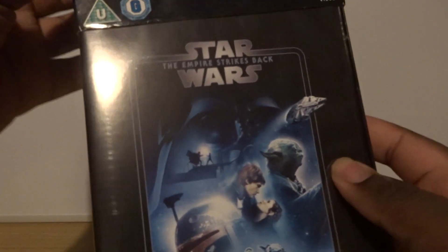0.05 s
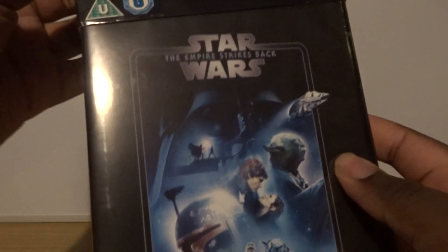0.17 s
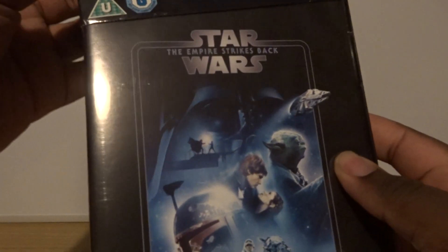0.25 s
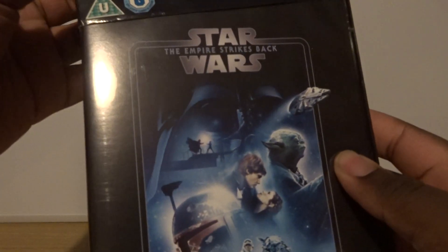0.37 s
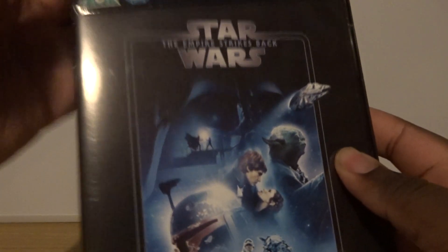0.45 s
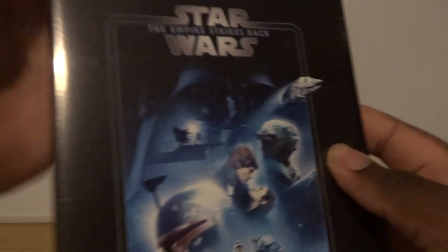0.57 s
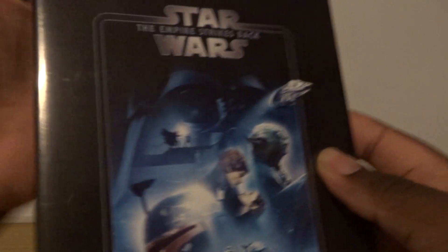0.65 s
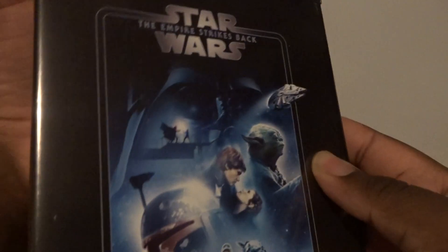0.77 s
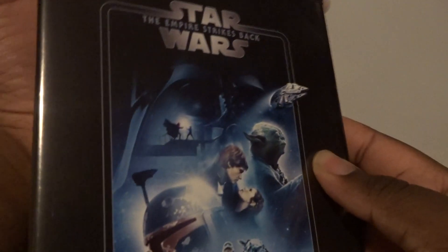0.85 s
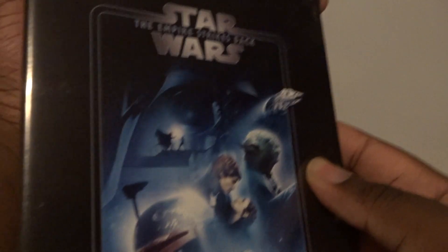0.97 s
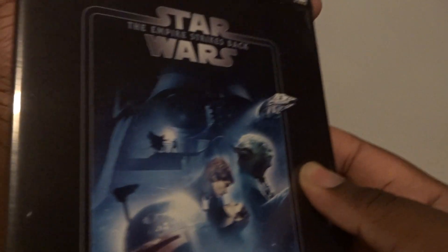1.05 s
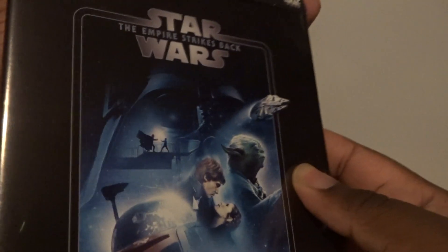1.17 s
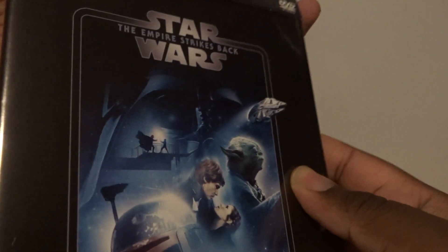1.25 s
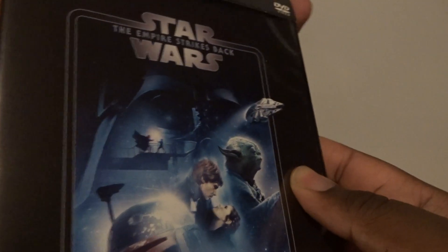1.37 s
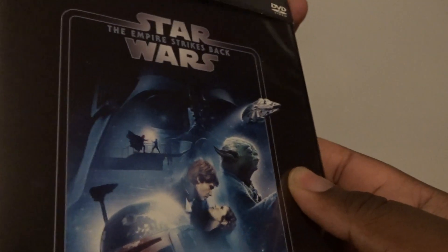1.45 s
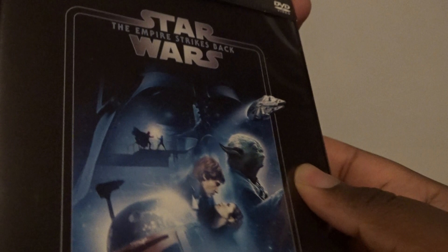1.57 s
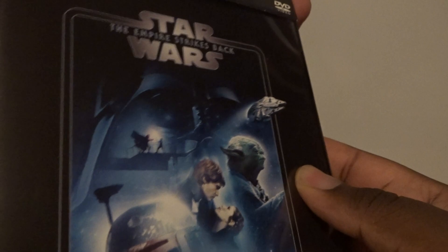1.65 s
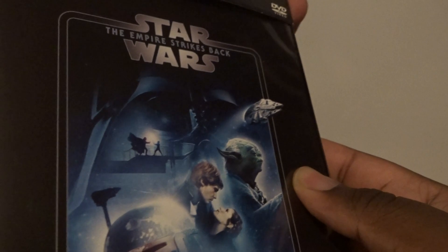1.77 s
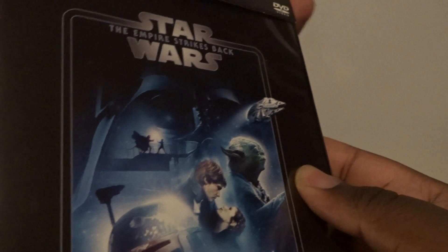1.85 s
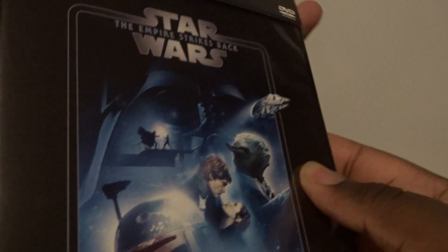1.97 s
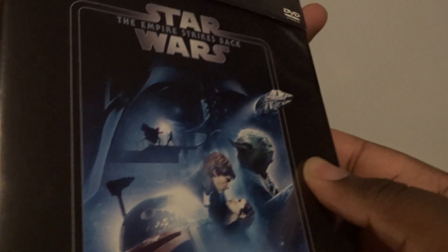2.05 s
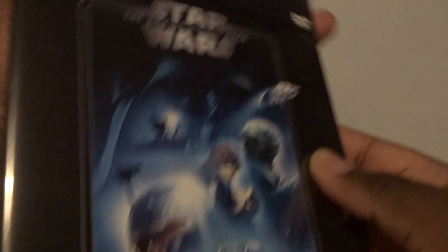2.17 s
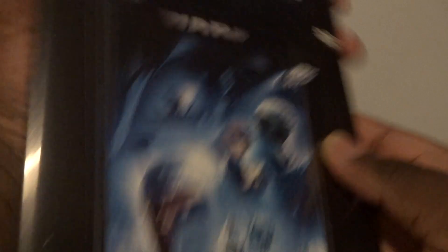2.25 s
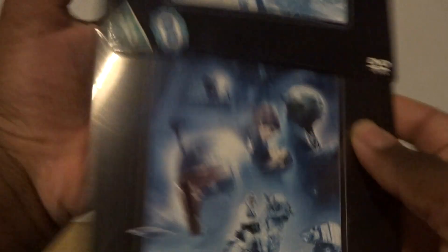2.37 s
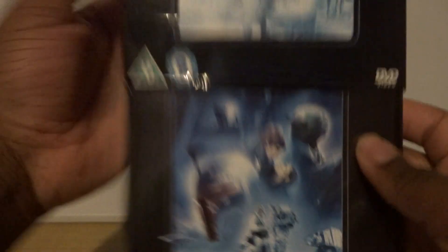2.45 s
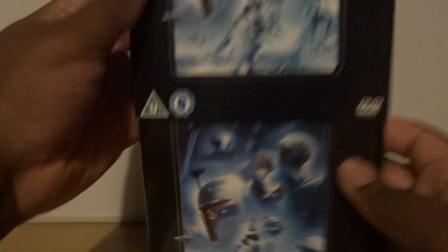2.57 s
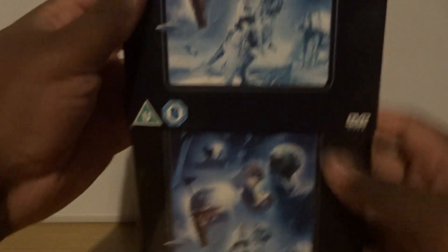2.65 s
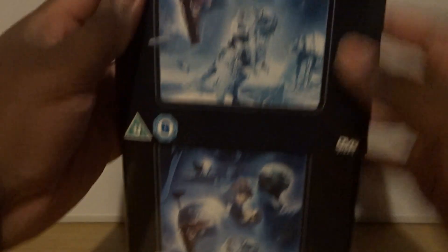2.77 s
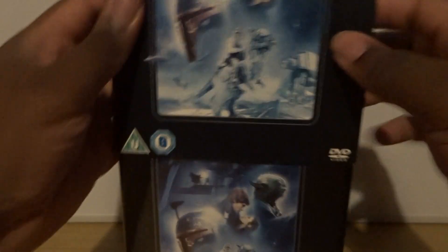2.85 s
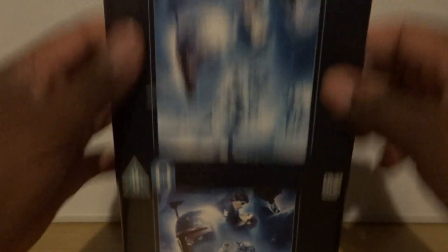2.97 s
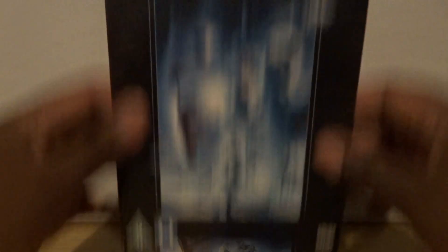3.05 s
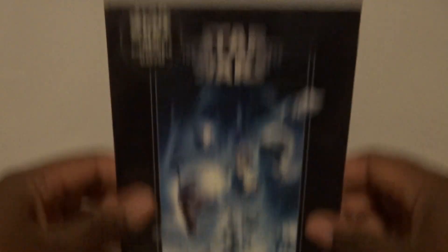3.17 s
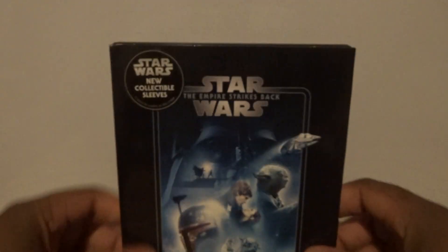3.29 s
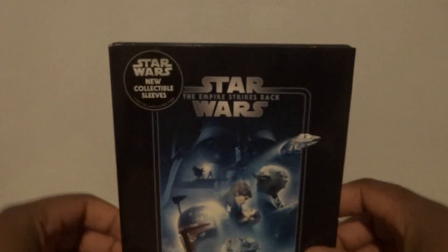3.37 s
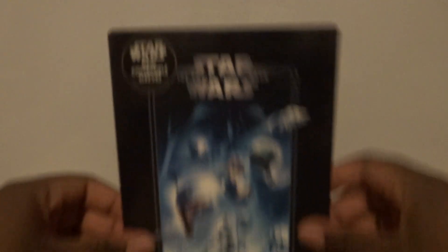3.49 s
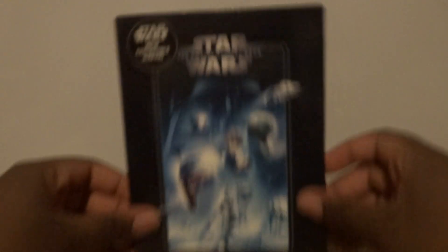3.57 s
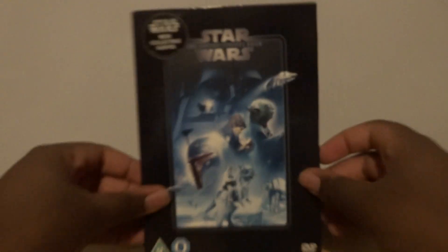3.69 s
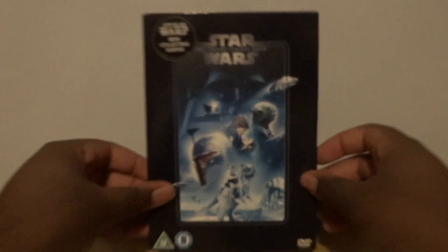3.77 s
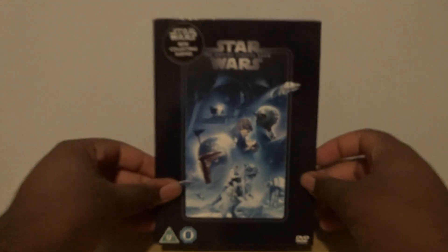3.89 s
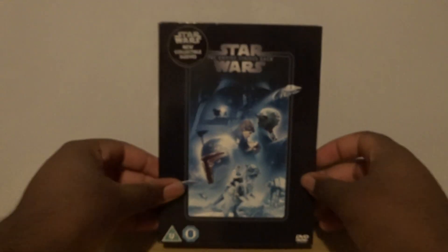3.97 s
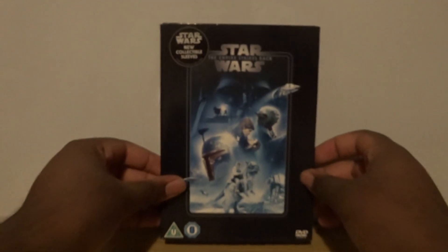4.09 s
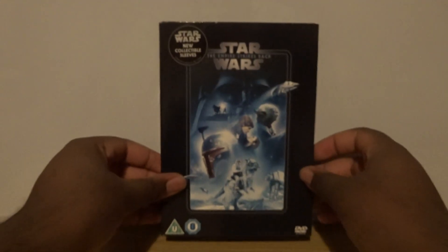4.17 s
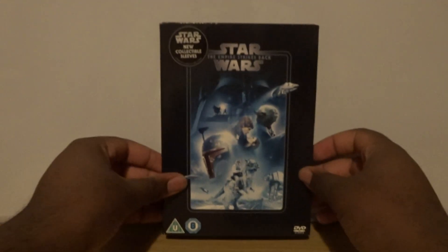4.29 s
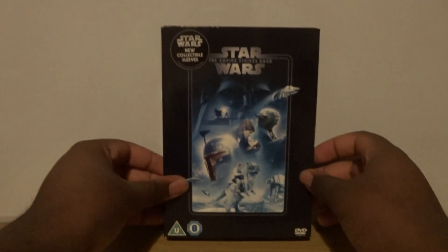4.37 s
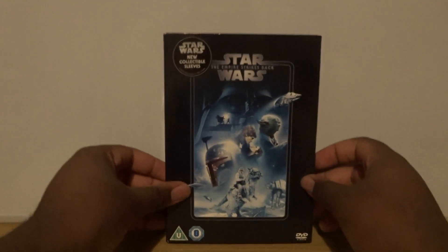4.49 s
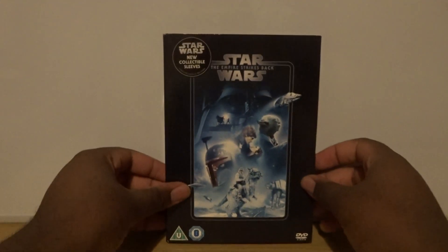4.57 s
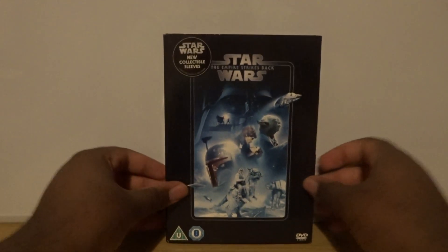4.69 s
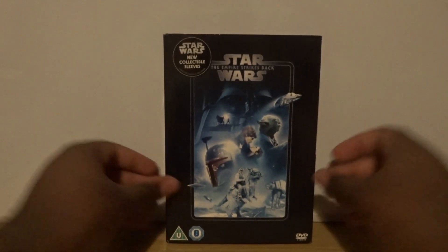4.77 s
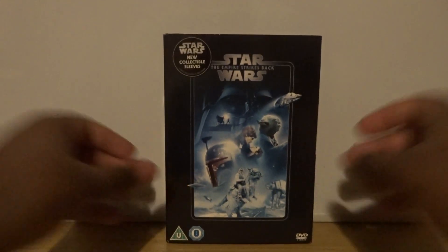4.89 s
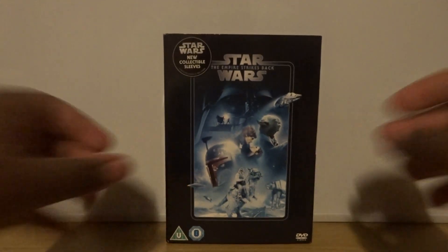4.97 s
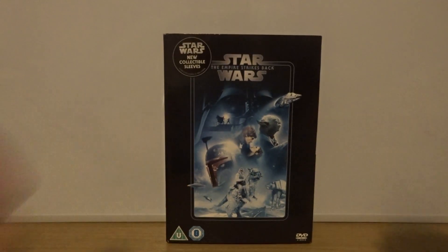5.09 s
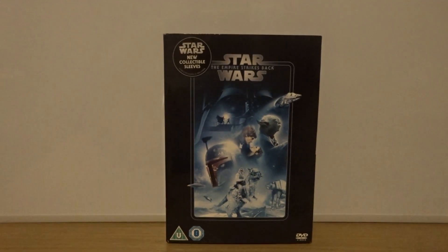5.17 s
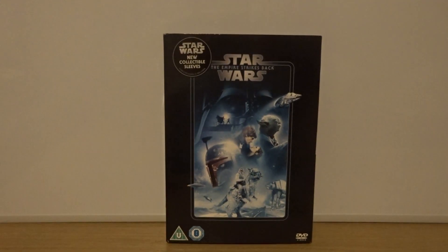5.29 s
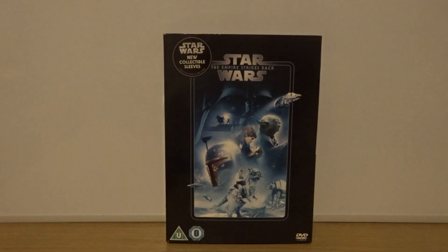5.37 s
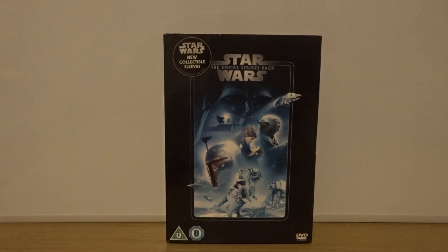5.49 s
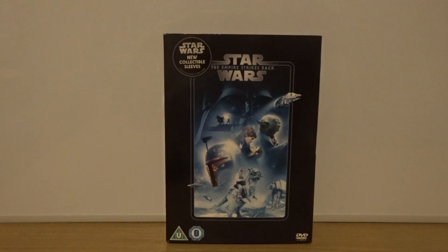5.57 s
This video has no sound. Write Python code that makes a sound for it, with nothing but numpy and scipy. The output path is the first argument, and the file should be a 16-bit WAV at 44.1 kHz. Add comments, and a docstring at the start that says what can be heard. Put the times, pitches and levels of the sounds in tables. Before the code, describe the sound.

A small, quiet room with low steady tone and soft microphone hiss. From 0 to 2 seconds, fingers barely brush a glossy plastic disc case, with faint ticks and dull taps; one bright, sharp snap of the clear cover stands out near 1.4. At about 2.15 to 2.35 a short, gritty scrape flutters, followed by very faint rubbing and tiny clicks around 2.5. At 2.84 a strong, low wooden knock with quick bounces lands, with sleeve rustle beneath. From 2.9 to 3.26 louder, uneven card-on-plastic scraping runs over smaller knocks, its tone rising slightly. At 3.27 to 3.33 the case clatters on the table in a tight, hollow burst. Cloth and scuffs fade. Near 4.5 a gentler double knock settles it; soft taps and cloth follow at 4.65 to 4.72. A tiny tick at 5.07, then only room tone until about 5.6.

```python
"""Card and fingers rub on a glossy plastic disc case as it is turned and slid into its cardboard sleeve.
The rubbing is uneven noise, shaped by broad hiss, the card faces and the air between card and case.
The clear cover ticks with short snaps; the case knocks and bounces on a wooden table, as ringing tones.
Arms and cuffs add low cloth noise. A small quiet room answers with a fading noise echo,
and steady noise makes the room tone and microphone hiss underneath."""
import sys
import numpy as np
from scipy import signal
from scipy.fft import rfft, irfft, next_fast_len
from scipy.io import wavfile
from scipy.ndimage import map_coordinates

SR = 44100
rng = np.random.default_rng(int(sys.argv[2]) if len(sys.argv) > 2 else 0)


def transcribe(u):
    """Save the signal u as a 16-bit wav file named by the first command-line argument.

    u: samples, shape (n,) or (channels, n), limited to [-1, 1]; the rate is SR.
    q: integer samples, one column per channel.
    """
    v = np.clip(np.atleast_2d(u).T, -1, 1)
    q = np.round(v * 32767).astype(np.int16)
    wavfile.write(sys.argv[1], SR, q)


N = 248277  # length in samples

# Colour of the room tone and microphone hiss: pitch_hz, relative level_db per Hz
TONE_COLOUR = [(12, -79), (20, -32), (48, -9.5), (86, -15), (116, -7), (301, -33), (336, -4), (421, -12.5),
               (470, -9.5), (735, -14), (822, -12.5), (1560, -21), (2590, -24), (3230, -27.5),
               (15900, -32.5)]
# Steady bands in the room tone: pitch_hz, width_hz (before filtering twice), level_db
STEADY_BANDS = [(117.5, 25, -72.5), (1532, 175, -67)]
# How alike left and right are in the room tone: pitch_hz, likeness (1 same, -1 opposite)
LIKENESS = [(60, 1), (150, 0.38), (380, -0.4), (950, -0.22), (2380, -0.18), (5980, 0.3), (15000, 1)]
# Arms and cuffs moving over the table: start_s, level_db before the random swell
CLOTH_LEVEL = [(0.0, -64), (0.56, -61), (0.82, -55), (1.19, -64), (2.02, -61.5), (2.32, -55.5),
               (2.79, -54.5), (2.85, -45), (3.13, -43.5), (3.29, -61), (3.43, -49.5), (3.56, -58.5),
               (4.4, -63.5), (4.7, -52.5), (4.95, -58.5), (5.63, -70)]
# Colour of the cloth noise: pitch_hz, relative level_db per Hz
CLOTH_COLOUR = [(29, -43), (50, -9), (92, -8), (232, -1), (338, -2.5), (441, -8.5), (900, -12), (1170, -16),
                (1980, -120)]

# Ringing tones of the table top: pitch_hz, relative level_db, t60_s (time to fade by 60 dB)
TABLE_MODES = [(126, -11.5, 0.28), (246.9, 1, 0.15), (274, -2.5, 0.1), (334.8, -4, 0.14), (405, -7.5, 0.09),
               (575, -14, 0.16)]
# Ringing tones of the hollow case: pitch_hz, relative level_db, t60_s
CASE_MODES = [(604, 11, 0.056), (703, -14, 0.14), (757.7, -12, 0.39), (821, 5.5, 0.042), (920, -1, 0.04),
              (1088, 4.5, 0.07), (1134, 1, 0.013), (1404, 16, 0.013), (1580, 3, 0.027), (1730, -26, 0.039),
              (2090, 2, 0.026), (2240, -12, 0.055)]
# The whole table giving under a push: pitch_hz, relative level_db, t60_s
DEEP_MODES = [(110, 0, .07)]
# The case meets the table: start_s, table_db, case_db, contact_ms (on the table)
KNOCKS = [(2.503, -42, -38, 2.5), (2.838, -7, -22.5, 1.9), (2.8538, -11, -20, 1.73),
          (2.869, -26.5, -21, 0.41), (2.885, -12.5, -26, 0.53), (2.96, -18, -30.5, 1.4),
          (3.056, -27, -60, 1.9), (3.124, -18.5, -34, 2.7), (3.214, -33.5, -30, 0.57),
          (3.241, -30, -50, 0.78), (3.27, -11.5, -9.5, 0.67), (3.285, -17, -14.5, 1.4),
          (3.298, -10, -11, 0.99), (3.311, -23, -13, 2.24), (3.332, -21, -17, 1.54),
          (3.412, -31.5, -54, 0.4), (3.426, -33.5, -70, 0.55), (4.501, -19, -22, 1.39),
          (4.521, -18.5, -40, 0.8), (4.552, -41, -44, 1), (4.574, -37.5, -54, 1.6), (4.667, -41, -33, 2.7)]
# Taps on the hollow case: start_s, peak_db, contact_ms
TAPS = [(0.035, -48, 0.25), (0.063, -45, 0.61), (0.213, -59, 0.33), (0.546, -53, 0.11),
        (0.868, -41.5, 0.29), (2.498, -37, 0.31), (2.504, -34.5, 0.13), (2.511, -34, 0.89), (4.663, -30, 1),
        (4.67, -43, 0.69), (4.681, -31, 0.66), (4.693, -36, 0.96), (4.713, -35, 1), (4.722, -49, 1)]
# Soft pushes of the hands on the table: start_s, peak_db
THUDS = [(2.5, -43), (2.841, -33), (3.272, -39), (4.496, -43.5), (4.663, -44), (4.712, -47)]
# The clear cover unsticks: start_s, snap_db, pitch_hz, case_db
TICKS = [(0.0237, -35.5, 11000, -50), (0.4723, -45.5, 7710, -54), (0.7063, -43, 7950, -60),
         (1.1428, -37, 12400, -70), (1.3834, -13.5, 14100, -39), (2.5071, -25.5, 3470, -61),
         (2.5111, -35, 3300, -28.5), (3.4298, -42, 5360, -32), (3.46, -44.5, 3535, -40),
         (4.118, -39, 5000, -50), (4.5002, -35.5, 6250, -39), (4.5625, -46, 3770, -44),
         (4.654, -38.5, 4100, -48), (4.7138, -37.5, 3580, -52), (5.0661, -32.5, 8160, -70)]

# Colour of the broad rubbing hiss: pitch_hz, relative level_db per Hz
HISS_COLOUR = [(1820, -83), (3100, -4.5), (3960, 0), (4310, 1.5), (5050, 0.5), (7150, -4), (7500, -6.5),
               (9750, -21), (16500, -120)]
# Colour of the fine, higher hiss: pitch_hz, relative level_db per Hz
FINE_COLOUR = [(4410, -44), (7500, -11.5), (12000, -5.5), (14400, -13), (15800, -12)]
# Resonances of the card faces: pitch_hz, width_hz (before filtering twice), relative level_db
FACE_PEAKS = [(719, 420, -2), (922, 430, 3), (1238, 337, 3), (1700, 666, 3)]
# Resonances of the air between card and case: pitch_hz, width_hz (before filtering twice), relative level_db
GAP_PEAKS = [(2020, 546, 6.5), (2425, 890, 2.4), (2863, 2070, 6.5)]
# Gliding bands in the air gap: start_s, end_s, start_hz, end_hz, level_db over the resonances, width_hz
GAP_GLIDES = [(2.138, 2.334, 3024, 2740, -4.5, 550), (2.68, 2.835, 2480, 2560, 13, 480),
              (2.9, 3.263, 2286, 2602, 1, 550)]
# Gliding bands in the card faces: start_s, end_s, start_hz, end_hz, level_db over the resonances, width_hz
FACE_GLIDES = [(2.144, 2.337, 1120, 1308, 3.5, 280), (2.905, 3.051, 1150, 1346, 4.5, 280),
               (3.104, 3.257, 1200, 1370, -4, 280)]
# The case slides in the sleeve, one list a slide: time_s, level_db, brightness_db, face_db (both over level_db)
SLIDES = [
    [(2.12, -85, 3, 4.5), (2.15, -48, -2, 6), (2.188, -35.5, -7, -10.5), (2.208, -44.5, 2, 0),
     (2.228, -34, -5, 0.5), (2.252, -40.5, -0.5, -6.5), (2.276, -39.5, 1.5, -1), (2.286, -33.5, -3, -3.5),
     (2.3, -30.5, -0.5, -2), (2.326, -41, 3, -2.5)],
    [(2.326, -39.5, 1, -2), (2.346, -52, 3, 1), (2.422, -62.5, 4.5, 8), (2.448, -54, 2, 10),
     (2.482, -64.5, -1.5, -2), (2.512, -46, -3.5, 7.5), (2.538, -57, 0.5, 5.5), (2.63, -59, 6.5, 3.5),
     (2.696, -61, -7, 3), (2.738, -55.5, -9.5, 4.5), (2.828, -55, -10.5, 0), (2.835, -64, -10, -1)],
    [(2.9, -57, -12, -5), (2.918, -44.5, 7.5, 10.5), (2.96, -23.5, -3.5, -8), (2.988, -26.5, 3, -2.5),
     (3.048, -24, -2.5, -15), (3.062, -35, 4.5, 0.5), (3.07, -25.5, -0.5, -12.5), (3.108, -23.5, -2, -14.5),
     (3.16, -32, 2.5, -11.5), (3.264, -41.5, 4.5, 4.5), (3.271, -35, -9, 6)],
]
# Short scuffs of fingers, card and case:
# peak_s, level_db, rise_s, fall_s, brightness_db, face_db (both over level_db)
SCUFFS = [(0.03, -67, 0.042, 0.85, -3, 6.5), (0.214, -60.5, 0.034, 0.087, 0.5, 10),
          (0.441, -61.5, .03, 0.025, -2.5, 6), (0.475, -56.5, .008, 0.033, -3.5, 5.5),
          (0.547, -56.5, .006, 0.055, -3.5, 6), (0.61, -62.5, 0.14, .15, 0, 4.5),
          (0.714, -62, 0.037, 0.15, -2, 6), (0.84, -62.5, 0.072, 0.16, -3, 0),
          (0.97, -60.5, 0.18, 0.14, -1.5, 4), (1.19, -68, 0.071, 0.35, -5, 3.5),
          (1.39, -51, .01, 0.068, -3.5, -1.5), (1.6, -59, 0.12, .09, -4.5, 0),
          (1.91, -66.5, 0.03, 0.18, -0.5, 6), (2.012, -51.5, 0.072, 0.089, -3, 2),
          (2.87, -29, 0.038, 0.058, -8, -0.5), (3.278, -35.5, .006, 0.079, -2.5, 12.5),
          (3.43, -57, 0.023, 0.14, 0, 4), (3.52, -71, 0.19, 0.53, 2, 7.5), (4.124, -68, 0.079, 0.055, 5, 8),
          (4.48, -83, 0.13, 0.036, 15, 0), (4.515, -56, 0.016, 0.11, -3.5, 6.5),
          (4.667, -61, 0.028, 0.19, 2, 9.5), (5.08, -74.5, .4, 0.22, 5, 6)]
SCUFF_SPAN_DB = 20  # level change over one rise or fall
FINE_SLIDE_DB, FINE_SCUFF_DB = [-1.5, -5, -4.5], -3  # fine hiss over broad hiss: each slide, all scuffs

# The room's answer: pitch_hz, t60_s, relative level_db
ROOM_ECHO = [(150, 0.19, -50), (1000, 0.18, -5), (4080, 0.27, -13.5), (12500, 0.13, -31)]
# Phase between the two microphone openings: pitch_hz, left_lead_radians
LEFT_LEAD = [(60, .35), (250, .55), (600, .62), (1200, .55), (2200, .38), (4000, .2), (8000, .08)]


def amp(db):
    """Turn decibels into a plain gain."""
    return 10 ** (np.asarray(db) / 20)


def unit(x):
    """Scale a sound to an average (rms) level of 1."""
    return x / np.sqrt(np.mean(x ** 2) + 1e-20)


def along(points, hz):
    """Read a curve of (pitch, value) points, spacing pitch as the ear does."""
    f, v = np.transpose(points)
    return np.interp(np.log(hz + 1), np.log(f + 1), v)


def curves(rows):
    """Give one value per sample for each column after the time."""
    s, *cols = np.transpose(rows)
    return [np.interp(np.arange(N) / SR, s, c) for c in cols]


def wobble(rate):
    """Draw a smooth random curve with this many random points a second."""
    points = rng.standard_normal(int(N * rate / SR) + 4)
    return map_coordinates(points, [np.arange(N) * rate / SR])


def filtered(x, response):
    """Change the strength and phase of each pitch in x."""
    m = next_fast_len(N + SR // 2)
    return irfft(rfft(x, m) * response(np.fft.rfftfreq(m, 1 / SR)), m)[..., :N]


def resonance(centre, width):
    """A springy body answers most strongly near its own pitch."""
    return lambda f: 1j * f * width / (centre ** 2 - f ** 2 + 1j * f * width)


def pair(gain, alike):
    """Stereo noise of rms 1, with a given colour and left-right likeness."""
    def shares(hz):
        turn = np.arccos(np.clip(along(alike, hz), -1, 1)) / 2
        return gain(hz) * [np.cos(turn), np.sin(turn)]

    mid, side = filtered(rng.standard_normal((2, N)), shares)
    return unit(np.array([mid + side, mid - side]))


def add(track, s, sound):
    """Mix a sound in at s seconds."""
    part = track[round(s * SR):][:len(sound)]
    part += sound[:len(part)]


def room_tone():
    """Steady air noise with two narrow bands, over microphone hiss."""
    air = amp(-59.5) * pair(lambda hz: amp(along(TONE_COLOUR, hz)), LIKENESS)
    bands = [amp(db) * pair(lambda f: np.abs(resonance(hz, width)(f)) ** 2, LIKENESS)
             for hz, width, db in STEADY_BANDS]
    return air + sum(bands)


def shuffle():
    """Arms and cuffs make low cloth noise that swells unevenly."""
    db, = curves(CLOTH_LEVEL)
    cloth = pair(lambda hz: amp(along(CLOTH_COLOUR, hz)), [(100, 0.97), (500, 0.122)])
    return amp(db + 2.05 * wobble(25.14)) * cloth


def ring(modes, contact_ms, rise_cycles, scatter_db, detune, low_hz, flip_hz=np.inf):
    """A short push makes a body ring, peak 1; a longer contact sounds duller."""
    t = np.arange(SR // 3) / SR
    body = np.zeros(len(t))
    for hz, db, t60 in modes:
        # every strike shifts the level and pitch of each tone at random
        level_db = db + scatter_db * rng.standard_normal()
        pitch = hz * (1 + detune * rng.standard_normal())
        swell = amp(-60 * t / t60) * (1 - np.exp(-t * hz / rise_cycles)) ** 2
        # tones above flip_hz swing the other way
        body += np.sign(flip_hz - hz) * amp(level_db) * swell * np.sin(2 * np.pi * pitch * t)
    push = np.sin(np.pi * np.clip(t[:300] / (contact_ms / 1000), 0, 1))
    out = signal.fftconvolve(body, push)[:len(t)]
    # a body sends out little sound below low_hz
    out = signal.sosfilt(signal.butter(4, low_hz, "high", fs=SR, output="sos"), out)
    return -out / np.abs(out).max()


def table(contact_ms):
    """The table top rings when struck."""
    return ring(TABLE_MODES, contact_ms, rise_cycles=0.27, scatter_db=4.5, detune=0, low_hz=166, flip_hz=300)


def case(contact_ms):
    """The hollow case rings when struck; the grip shifts its tones a little."""
    return ring(CASE_MODES, contact_ms, rise_cycles=0.06, scatter_db=3, detune=0.04, low_hz=500, flip_hz=800)


def knocks():
    """Landings ring table and case, taps ring the case, and soft pushes move the whole table."""
    out = np.zeros(N)
    for s, table_db, case_db, contact_ms in KNOCKS:
        add(out, s, amp(table_db) * table(contact_ms))
        add(out, s, amp(case_db) * case(0.42 * contact_ms))
    for s, db, contact_ms in TAPS:
        add(out, s, amp(db) * case(contact_ms))
    for s, db in THUDS:
        thud = ring(DEEP_MODES, contact_ms=3, rise_cycles=0.13, scatter_db=0, detune=0.08, low_hz=54)
        add(out, s, amp(db) * thud)
    return out


def ticks():
    """The cover unsticks: a brief snap, a short spray of noise and a little ring of the case."""
    out, t = np.zeros(N), np.arange(900) / SR
    for s, db, hz, case_db in TICKS:
        snap = amp(-60 * t / 0.0026) * np.sin(2 * np.pi * hz * t)
        spray = 0.16 * amp(-60 * t / 0.017) * rng.standard_normal(len(t))
        add(out, s, amp(db) * (snap + spray))
        add(out, s, amp(case_db) * case(contact_ms=0.056))
    return out


def layer_powers(db, bright_db, face_db, fine_db):
    """Powers of broad hiss, fine hiss, air gap and card face."""
    return amp([db + bright_db, db + bright_db + fine_db, db, db + face_db]) ** 2


def contact_levels():
    """Contacts that overlap add their powers; this gives the gain of each rubbing layer."""
    t = np.arange(N) / SR
    power = np.full((4, N), 1e-12)
    for rows, fine_db in zip(SLIDES, FINE_SLIDE_DB):
        sliding = (t > rows[0][0]) & (t <= rows[-1][0])
        power += layer_powers(*curves(rows), fine_db) * sliding
    for s, db, rise_s, fall_s, bright_db, face_db in SCUFFS:
        near = slice(max(0, round((s - 2 * rise_s) * SR)), round((s + 2 * fall_s) * SR))
        loss_db = SCUFF_SPAN_DB * np.maximum((s - t[near]) / rise_s, (t[near] - s) / fall_s)
        power[:, near] += layer_powers(db - loss_db, bright_db, face_db, FINE_SCUFF_DB)
    return np.sqrt(power)


def gliding_band(clumps, start, end, from_hz, to_hz, width_hz):
    """Narrow noise carried on a moving pitch, as uneven as the rubbing."""
    low_pass = signal.butter(4, width_hz / 2, fs=SR, output="sos")
    a, b = signal.sosfilt(low_pass, rng.standard_normal((2, N)))
    pitch = np.interp(np.arange(N) / SR, [start, end], [from_hz, to_hz])
    turn = 2 * np.pi * np.cumsum(pitch) / SR
    return unit(clumps * (a * np.cos(turn) + b * np.sin(turn)))


def rubbing_voice(slips, clumps, peaks, glides, swell_db):
    """Slips excite fixed resonances that swell separately, joined by gliding bands."""
    t = np.arange(N) / SR
    out = np.zeros(N)
    for hz, width, db in peaks:
        tone = unit(filtered(slips, lambda f: resonance(hz, width)(f) ** 2))
        out += amp(db + swell_db * wobble(15)) * tone
    out = unit(out)
    for start, end, from_hz, to_hz, glide_db, width_hz in glides:
        band = gliding_band(clumps, start, end, from_hz, to_hz, width_hz)
        gain = amp(glide_db) * ((t > start) & (t < end))
        # keep the total level steady as the band joins
        out = (out + gain * band) / np.sqrt(1 + gain ** 2)
    return out


def rubbing():
    """Tiny slips of uneven size excite the card faces, the air gap and two kinds of hiss."""
    clumps = amp(0.96 * wobble(25.116) + 0.97 * wobble(60) + 0.93 * wobble(350))
    slips = clumps * amp(1.6 * rng.exponential(size=N)) * rng.standard_normal(N)
    hiss = unit(filtered(slips, lambda hz: amp(along(HISS_COLOUR, hz))))
    fine = unit(filtered(slips, lambda hz: amp(along(FINE_COLOUR, hz))))
    gap = rubbing_voice(slips, clumps, GAP_PEAKS, GAP_GLIDES, swell_db=1.2)
    face = rubbing_voice(slips, clumps, FACE_PEAKS, FACE_GLIDES, swell_db=1.5)
    return np.sum(contact_levels() * [hiss, fine, gap, face], axis=0)


def room(x):
    """Each pitch of the room's answer has its own level and fades at its own speed."""
    hz, t, noise = signal.stft(rng.standard_normal((2, SR // 2)), SR, nperseg=256)
    centre, t60, db = np.transpose(ROOM_ECHO)
    t60 = along(np.c_[centre, t60], hz)[:, None]
    db = along(np.c_[centre, db], hz)[:, None]
    # a longer fade starts lower, so it does not gain energy
    fading = noise * amp(db - 60 * t / t60) / np.sqrt(t60 * SR / 14)
    tail = signal.istft(fading, SR, nperseg=256)[1]
    late = np.pad(x, (200, 0))  # the answer is 200 samples late
    return signal.fftconvolve(late[None], tail, axes=1)[:, :N]


def scene():
    """Near sounds reach two microphone openings, with the room, cloth and room tone around them."""
    near = rubbing() + knocks() + ticks()
    # each opening takes half of the phase difference
    ports = filtered(near, lambda hz: np.exp(1j * np.outer([0.5, -0.5], along(LEFT_LEAD, hz))))
    balance = amp([[0.15], [-0.15]])  # left a touch louder
    return ports * balance + room(near) + shuffle() + room_tone()


def record(dry):
    """The camera keeps nothing at or above its band limit of 15850 Hz."""
    return filtered(dry, lambda hz: hz < 15850)


dry = scene()
out = record(dry)
transcribe(out)
```